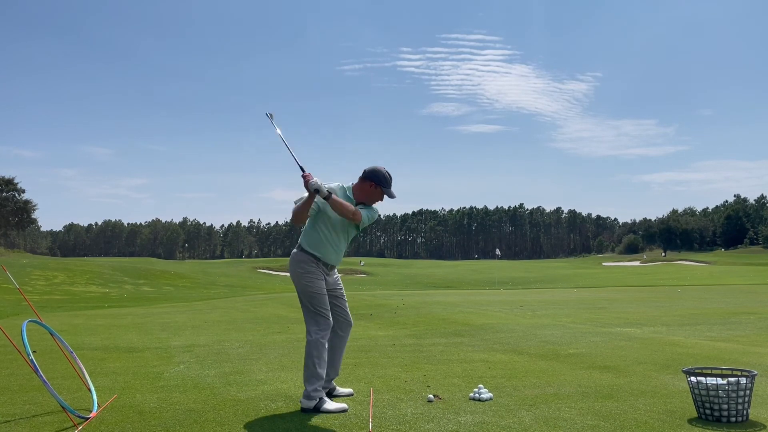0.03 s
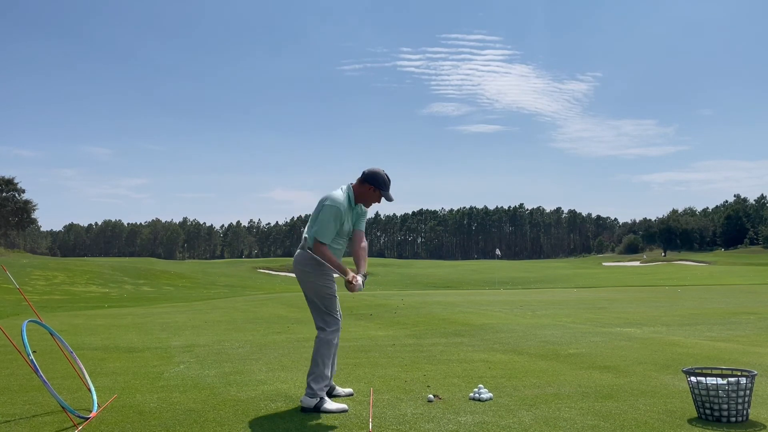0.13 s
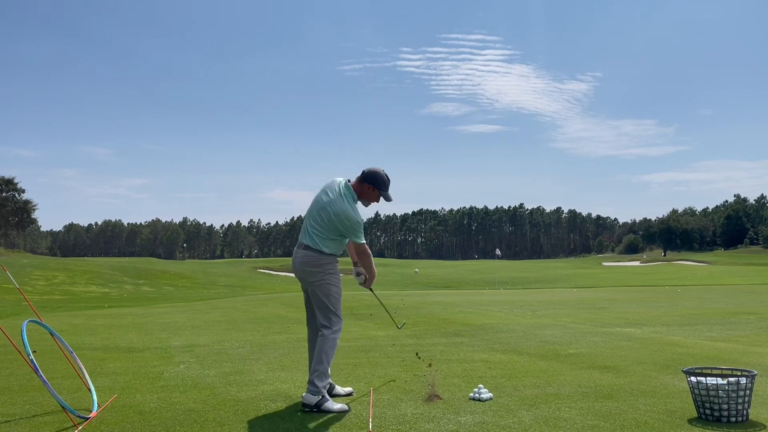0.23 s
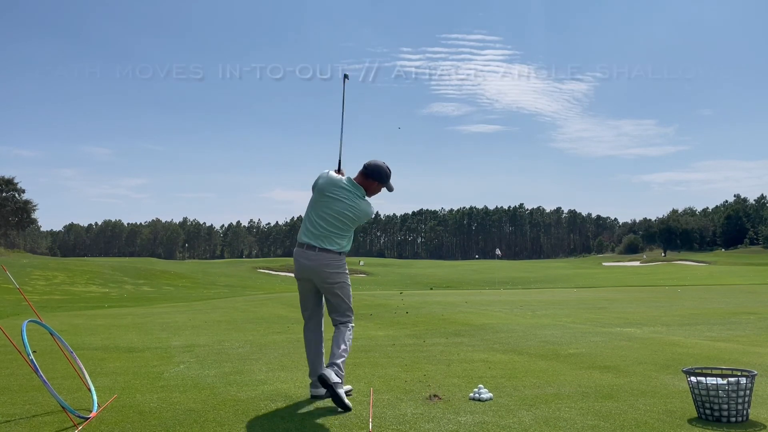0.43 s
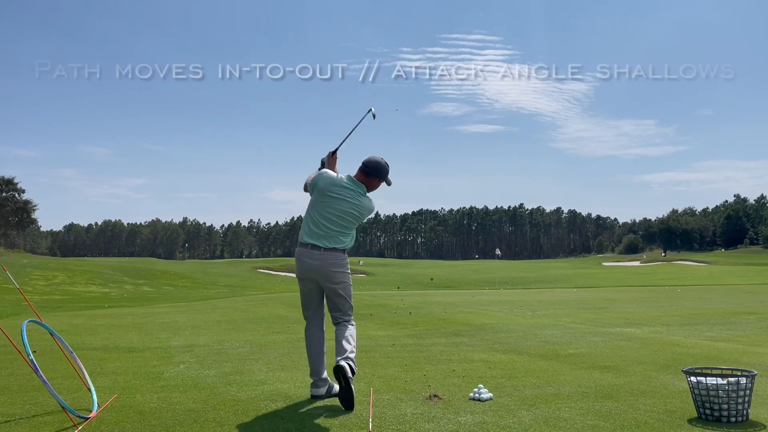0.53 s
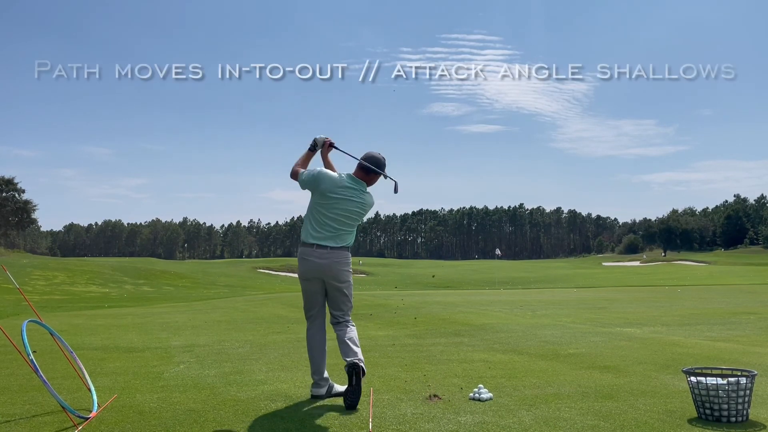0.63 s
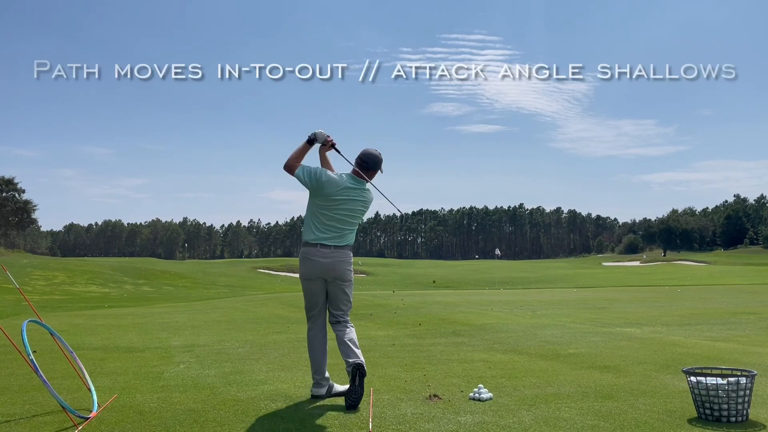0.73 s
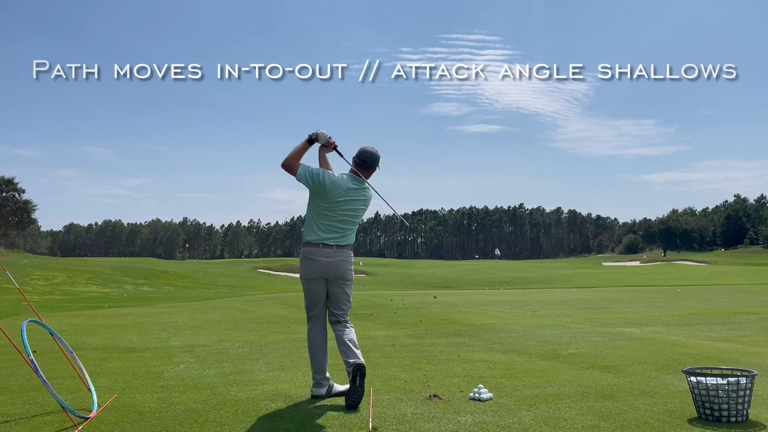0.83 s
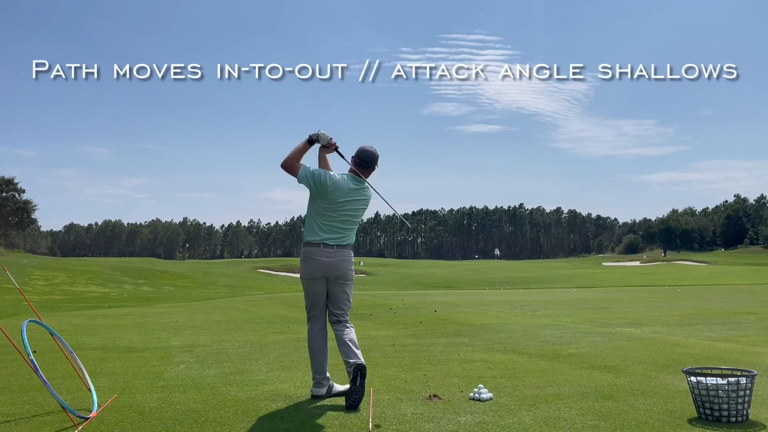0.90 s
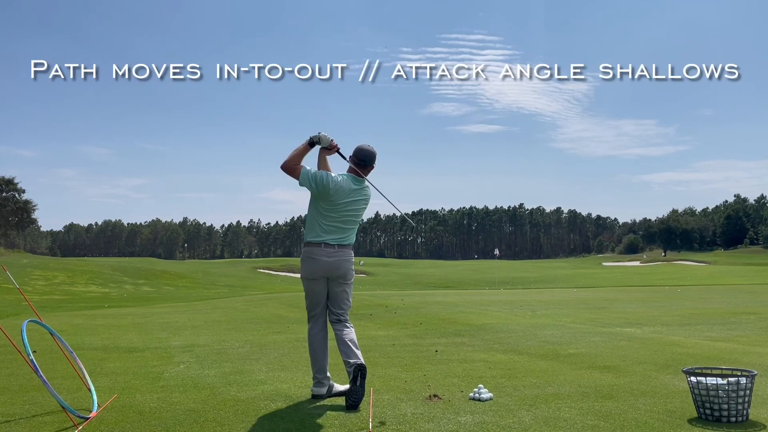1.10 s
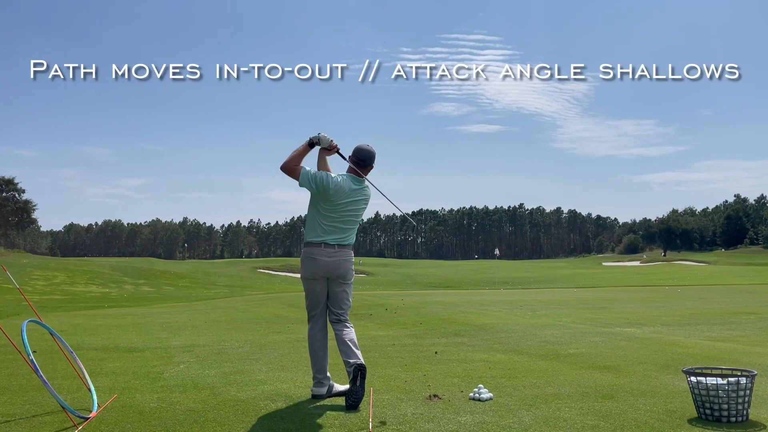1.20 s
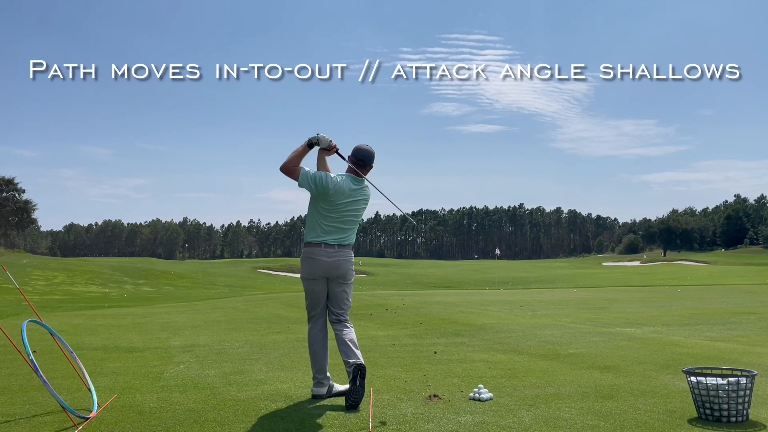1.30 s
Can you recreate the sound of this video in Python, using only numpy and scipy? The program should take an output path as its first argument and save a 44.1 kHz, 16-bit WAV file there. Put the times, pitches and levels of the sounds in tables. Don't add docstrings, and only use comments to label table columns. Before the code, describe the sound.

A golf iron hits a ball off turf: a swish rises from about 0.13 s into one hard, bright crack at 0.21 s, with tearing soil and a short ground thud. A softer swish follows to 0.3 s while a diffuse tree echo fades. Low wind rumbles throughout, a high insect rasps softly four times a second, and a tiny soil tick lands at 1.33 s.

```python
import sys
import numpy as np
from scipy import signal
from scipy.fft import rfft, irfft
from scipy.io import wavfile
from scipy.ndimage import uniform_filter1d

SR = 44100
rng = np.random.default_rng(int(sys.argv[2]) if len(sys.argv) > 2 else 0)


def volts(x):
    e = np.asarray(x, float) / 20
    return 10 ** e


def store_pcm(level_fs):
    pcm = np.round(np.clip(level_fs, -1, 1) * 32767).astype(np.int16)
    wavfile.write(sys.argv[1], SR, np.atleast_2d(pcm).T)


N = 59535
T = np.arange(N) / SR
IMPACT_S = 0.21

# frequency in Hz, likeness from 0 to 1.
SAME = [(60, .8), (250, .5), (600, .12), (1400, .15), (3000, .5), (5500, .82), (7500, .997), (16000, .98)]
# frequency in Hz, phase in radians.
LEAD = [(200, 0.0), (5000, .1), (6900, -1.4), (7850, -2.9), (8500, -3.4), (10600, -5.4), (11800, -6.28),
        (14400, -9.0), (17000, -10.2)]


def evened(x):
    return x / np.sqrt(np.mean(x ** 2) + 1e-20)


def read(points, hz):
    f, value = np.transpose(points)
    return np.interp(np.log(hz + 1), np.log(abs(f) + 1), value)


def curve(points, t, axis=1):
    columns = np.transpose(points)
    return np.interp(t, columns[0], columns[axis])


def near(low):
    return lambda hz: np.maximum(low, read(SAME, hz))


def ports(x, pan_db):
    turn = np.exp(0.5j * read(LEAD, np.fft.rfftfreq(N, 1 / SR)))
    paths = np.array([turn * volts(pan_db / 2), volts(-pan_db / 2) / turn])
    return irfft(rfft(x) * paths, N)


def hiss(field_db, alike, patchy_db, size=512):
    hop = size // 4
    hz = np.fft.rfftfreq(size, 1 / SR)[:, None]
    t = np.arange(N // hop + 2) * hop / SR
    a, b, c, d, patches = rng.standard_normal((len(t), len(hz), 5)).T
    patches = uniform_filter1d(patches, size=6, axis=0)
    patches = evened(uniform_filter1d(patches, size=10, axis=1))
    same = np.clip(alike(hz), 0, 1)
    left = a + 1j * b
    right = same * left * np.exp(-1j * read(LEAD, hz)) + np.sqrt(1 - same ** 2) * (c + 1j * d)
    unit = signal.istft(left, nperseg=size, noverlap=size - hop)[1].std()
    z = np.array([left, right]) * volts(field_db(hz, t) + patchy_db * patches)
    return signal.istft(z, nperseg=size, noverlap=size - hop)[1][:, :N] / unit


def weather():
    # frequency in Hz, level in dB per Hz.
    rumble = [(15, -40.5), (28, -14), (50, 0), (128, -0.16), (200, -8), (270, -21), (500, -30.5)]
    open_air = [(250, -0.7), (550, -5), (1000, -12), (1800, -22), (4100, -17.5), (8500, -23), (11500, -46),
                (15500, -58.5), (16200, -79.5)]
    # time in seconds, level in dB.
    gusts = [(0, -56), (.12, -50.5), (.2, -48.5), (.29, -48), (.37, -46), (.44, -51), (.56, -52),
             (.64, -53), (.75, -53), (.93, -52), (.965, -45), (1.01, -51.5), (1.07, -53), (1.2, -50),
             (1.35, -52)]
    alike = near(0)
    wind = evened(hiss(lambda hz, t: read(rumble + [(900, -60.5)], hz) + 0 * t, alike, 2.5, size=4096))
    air = evened(hiss(lambda hz, t: read([(100, -30)] + open_air, hz) + 0 * t, alike, 2.0, size=1024))
    wind_db = curve(gusts, T) + [[-1.2], [3.1]]
    air_db = -64 + np.array([[0.1], [-0.1]])
    return wind * volts(wind_db) + air * volts(air_db)


def insect():
    # start in seconds, length in seconds, level in dB.
    rasps = [
        (-.1, 0.14, -75),
        (0.116, .09, -68.5),
        (0.354, 0.1, -64.5),
        (0.602, 0.11, -64.5),
        (.855, 0.098, -69),
        (1.105, 0.097, -68),
        (1.336, 0.099, -71),
    ]
    # frequency in Hz, gain in dB.
    resonance = [(6000, -22.5), (6900, -1), (8500, 0.65), (10200, -10), (11500, -25.5)]
    edge_s, fade_s, teeth_per_s = 0.022, 0.025, 1500
    level = np.zeros(N)
    for s, length, db in rasps:
        rise = np.clip((T - s) / edge_s, 0, 1)
        level += volts(db) * rise * np.exp(-np.maximum(T - s - length, 0) / fade_s)
    teeth = 1.5 + (rng.random(N) < teeth_per_s / SR) * rng.exponential(1, N)
    scrape = evened(uniform_filter1d(teeth ** 2, size=40) * rng.standard_normal(N))
    gain_db = read([(4000, -59.5)] + resonance + [(14000, -59.5)], np.fft.rfftfreq(N, 1 / SR))
    voice = irfft(rfft(scrape) * volts(gain_db), N)
    return ports(level * evened(voice), pan_db=0.9)


def swish():
    # time in seconds, level in dB.
    sweep = [(.09, -69), (.13, -62.5), (.15, -44.5), (.184, -39), (.204, -43), (.232, -57.5), (.258, -48),
             (.28, -50), (.3, -62)]
    # frequency in Hz, level in dB.
    slow_head = [(200, -8.5), (420, 2), (1000, -4.5), (2500, -15.5), (6000, -33), (12000, -44.5),
                 (16000, -60)]
    fast_head = [(200, -11.5), (500, 1), (1300, -1), (2600, -4.5), (5000, -11), (12000, -22.5),
                 (15500, -30.5), (16200, -60)]
    follow_through = [(200, -19), (700, -7.5), (1700, -2), (3500, -0.2), (7000, -4.5), (12000, -16.5),
                      (15500, -24), (16200, -55)]
    # time in seconds, pitch in Hz, level in dB.
    shedding = [(.14, 330, -78), (.155, 400, -49), (.18, 540, -49), (.2, 600, -59.5), (.21, 600, -70.5)]
    width_hz = 110

    def field_db(hz, t):
        fast = np.interp(t, (0.14, 0.19), [0, 1])
        down = (1 - fast) * read(slow_head, hz) + fast * read(fast_head, hz)
        colour = np.where(t < IMPACT_S + 0.01, down, read(follow_through, hz))
        return colour + curve(sweep, t) - 200 * np.maximum(t - sweep[-1][0], 0)

    turn = np.exp(2j * np.pi * np.cumsum(curve(shedding, T)) / SR)
    r = np.exp(-np.pi * width_hz / SR)
    slow = rng.standard_normal(N) / turn
    for _ in range(2):
        slow = signal.lfilter([1 - r], [1, -r], slow)
    whistle = evened((turn * (slow + 0.9 * slow.std())).real)
    whistle *= volts(curve(shedding, T, axis=2)) * (T < IMPACT_S)
    return volts(8.5) * hiss(field_db, near(0.85), patchy_db=1.5) + ports(whistle, pan_db=3.7)


def ploughing_ring():
    # frequency in Hz, level in dB, 60 dB decay in seconds.
    modes = [(383, -23.5, .033), (732.3, -19, .03), (1050, -28, .022), (1230, -23, .022), (1420, -25, .018),
             (1610, -16, 0.018), (2135, -22, .016), (2755, -25.5, .018), (3705, -22.5, 0.012),
             (5320, -27, .014)]
    peak_s, rise_s = 0.2118, 0.0028
    since = T - peak_s
    out = np.zeros(N)
    for hz, level_db, t60 in modes:
        shape = np.where(since < 0, np.exp(-(since / rise_s) ** 2), volts(-60 * abs(since) / t60))
        out += volts(level_db) * shape * np.cos(2 * np.pi * hz * since)
    return out


def crunch():
    # frequency in Hz, level in dB per Hz.
    soil = [(150, -35.5), (400, -12), (1600, -4), (3500, -8.5), (6000, -5.5), (10000, -10), (13000, -11),
            (17000, -24)]
    # frequency in Hz, 60 dB decay in seconds.
    decay = [(300, 0.034), (1500, .033), (5000, .028), (12000, .016)]
    level_db, rise_s = -11, 0.0033

    def field_db(hz, t):
        dull_before = (t < IMPACT_S) * hz / 450
        fall = 60 * np.maximum(t - IMPACT_S - 0.002, 0) / read(decay, hz)
        return read(soil, hz) - dull_before - fall

    rise = np.clip(1 + (T - IMPACT_S) / rise_s, 0, 1) ** 2
    return volts(level_db) * rise * hiss(field_db, near(0.55), patchy_db=2.5, size=64)


def contacts():
    # time in seconds, level in dB, brightness in dB per octave.
    knocks = [
        (0.207, -35, -2.5),
        (0.2088, -27.5, -1.5),
        (0.2103, -16, 2.5),
        (.2110, -16, 1.5),
        (0.2119, -17, 0.2),
        (0.2124, -16, 1),
        (0.2123, -19, -1.4),
        (0.2154, -23.5, -2),
        (.2158, -21, -1.5),
        (0.2184, -33, -2.5),
    ]
    # frequency in Hz, level in dB, 60 dB decay in seconds.
    body = [(367, -16.5, .022), (730, -13.5, 0.018), (1170, -10.5, 0.011), (1602, -6, 0.012),
            (2130, -5.5, .012), (2737, -8, .012), (3760, -3.5, 0.0069), (4790, -7.5, .01),
            (5310, -4, 0.0088), (6350, -3, 0.009), (7400, -6.5, .005), (8900, -5.5, .003),
            (11430, -7.5, .003), (12500, -10.5, .003)]
    hz, db, t60 = np.transpose(body)[:, :, None]
    t = np.arange(2000) / SR
    out = np.zeros(N)
    for s, level_db, tilt_db in knocks:
        spread = rng.standard_normal((len(body), 1))
        level = volts(db + tilt_db * np.log2(hz / 2000) - 60 * t / t60)
        rings = level * np.sin(2 * np.pi * hz * (1 + 0.02 * spread) * t)
        out[round(s * SR):][:len(t)] += volts(level_db - 6.5) * (rings * np.sign(spread + 0.8)).sum(0)
    return out


def cover_tick():
    hit_s, rebound_s, pitch_hz, width_s = 0.21021, 0.00043, 12300, 0.000055
    out = np.zeros(N)
    for s, level_db in ((hit_s, -1.5), (hit_s + rebound_s, -8)):
        since = T - s
        out -= volts(level_db) * np.exp(-(since / width_s) ** 2) * np.cos(2 * np.pi * pitch_hz * since)
    return out


def echo():
    # frequency in Hz, level in dB.
    trees = [(250, -7.5), (650, 2), (2200, -4.5), (5000, -8.5), (9000, -13.5), (15500, -27.5), (16200, -55)]
    # frequency in Hz, 60 dB decay in seconds.
    decay = [(300, 1.6), (1500, 1.4), (5000, 1.3), (12000, 1.3)]
    level_db, reference_s, rise_s = -47, 0.31, 0.012
    field_db = lambda hz, t: read(trees, hz) - 60 * (t - reference_s) / read(decay, hz)
    rise = np.clip((T - IMPACT_S) / rise_s, 0, 1)
    return volts(level_db) * rise * hiss(field_db, near(0.15), patchy_db=1.5)


def thud():
    start_s, level_db, t60, rise_s = 0.213, -26.5, 0.12, 0.0036
    first_hz, end_hz, sag_s = 336, 116, 0.005
    late = np.maximum(T - start_s, 0)
    pitch_hz = end_hz + (first_hz - end_hz) * np.exp(-late / sag_s)
    level = np.minimum(late / rise_s, 1) * volts(level_db - 60 * late / t60)
    return level * np.sin(2 * np.pi * np.cumsum(pitch_hz * (late > 0)) / SR)


def strike():
    club = ploughing_ring() + contacts() + cover_tick()
    club = signal.lfilter(*signal.butter(2, 260, "high", fs=SR), club)
    return ports(club + thud(), pan_db=0.4) + crunch()


def crumb():
    start_s, level_db, t60 = 1.332, -47.5, 0.012
    late = T - start_s
    level = (late > 0) * volts(level_db - 60 * abs(late) / t60)
    tick = level * uniform_filter1d(rng.standard_normal(N), size=12)
    return ports(tick, pan_db=4.0)


def scene():
    return weather() + insect() + swish() + strike() + echo() + crumb()


def band_limit(x):
    return signal.sosfilt(signal.butter(12, 17110, fs=SR, output="sos"), x)


def record(dry):
    low_pass = signal.firwin(511, 16900, window=("kaiser", 9), fs=SR)
    mix = signal.oaconvolve(dry, low_pass[None], "same")
    return band_limit(mix)


dry = scene()
out = record(dry)
store_pcm(out)
```